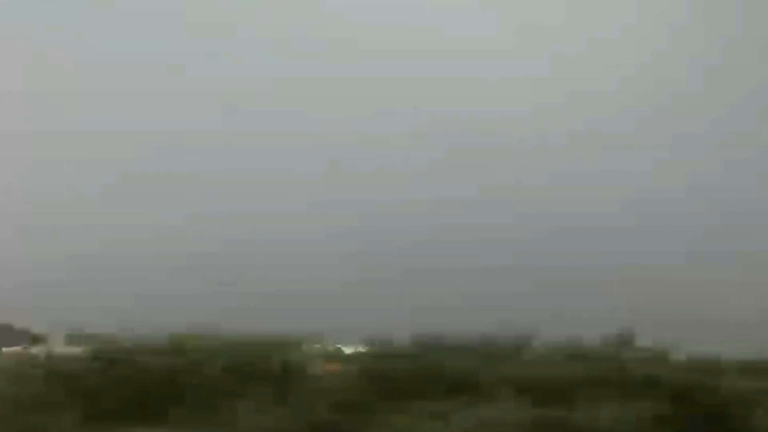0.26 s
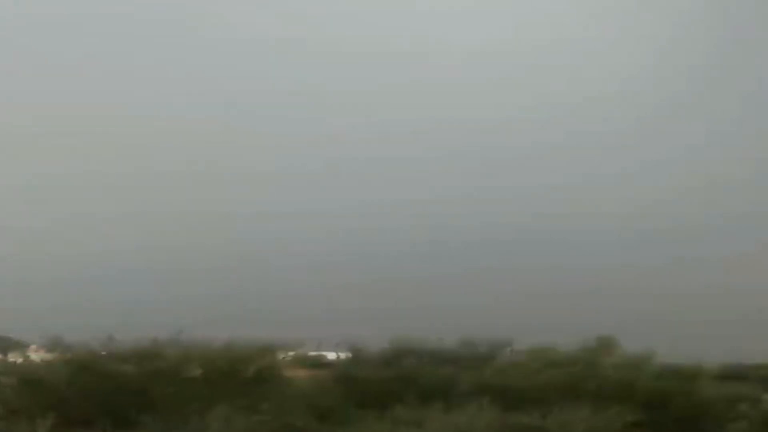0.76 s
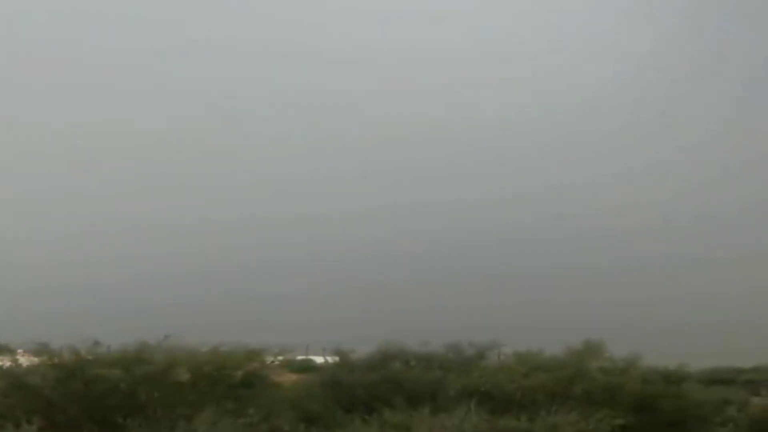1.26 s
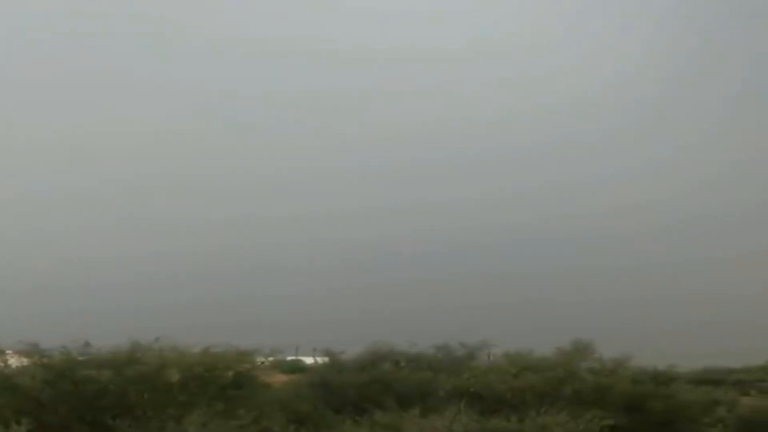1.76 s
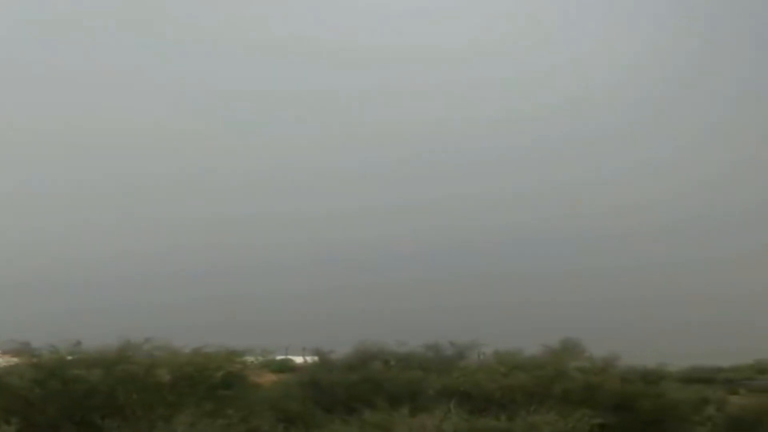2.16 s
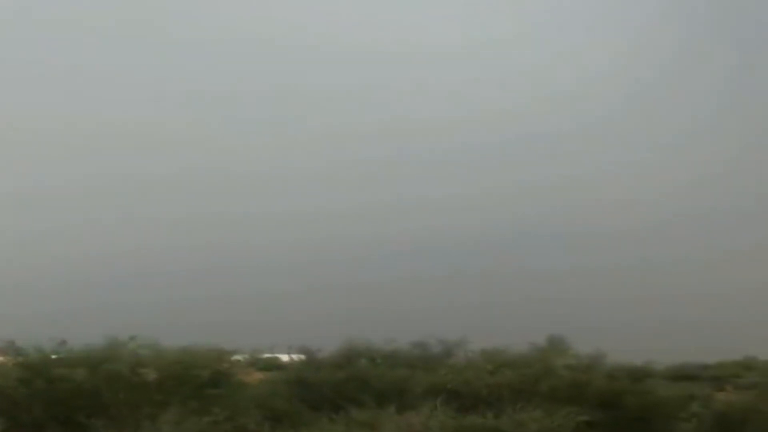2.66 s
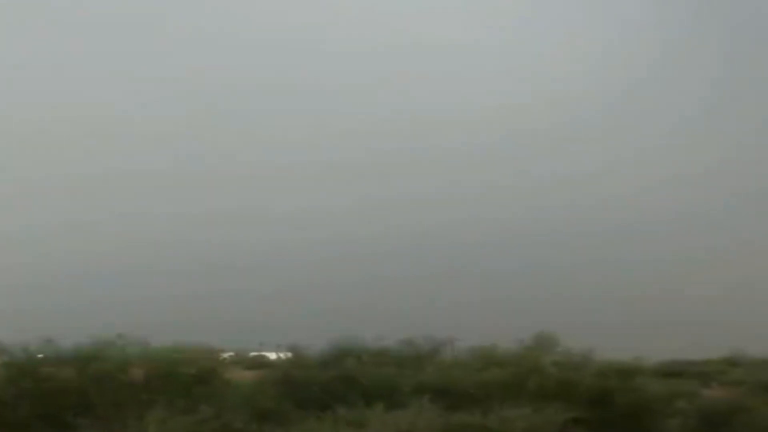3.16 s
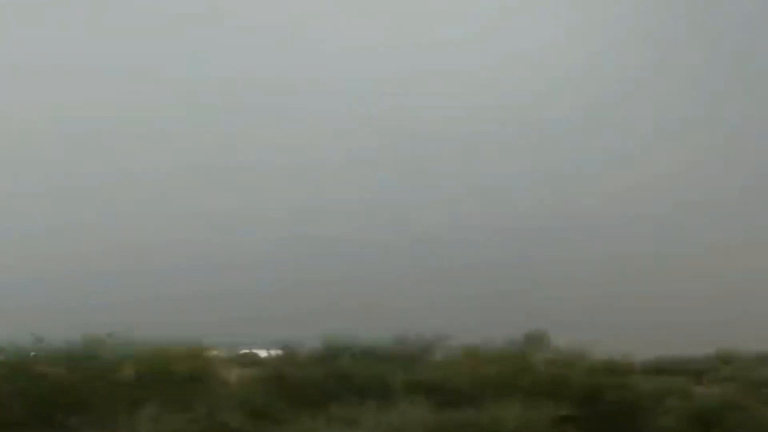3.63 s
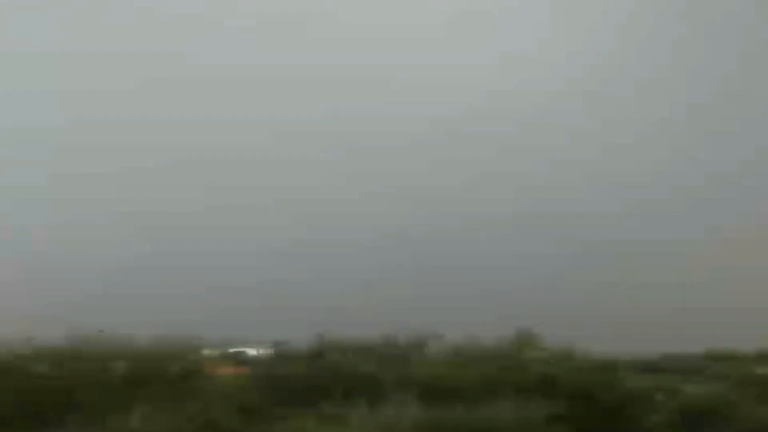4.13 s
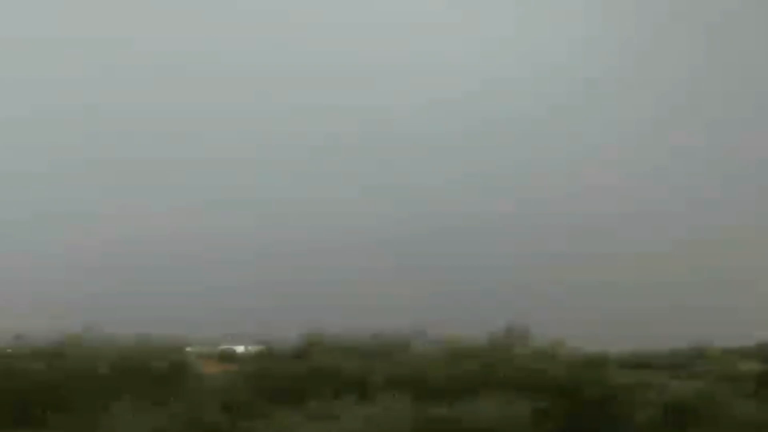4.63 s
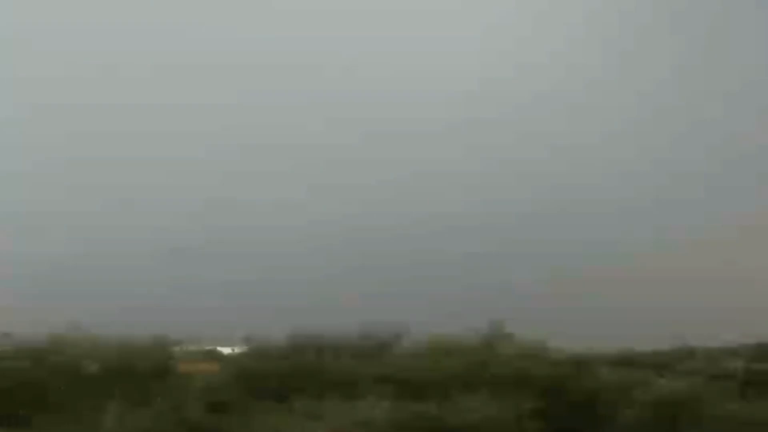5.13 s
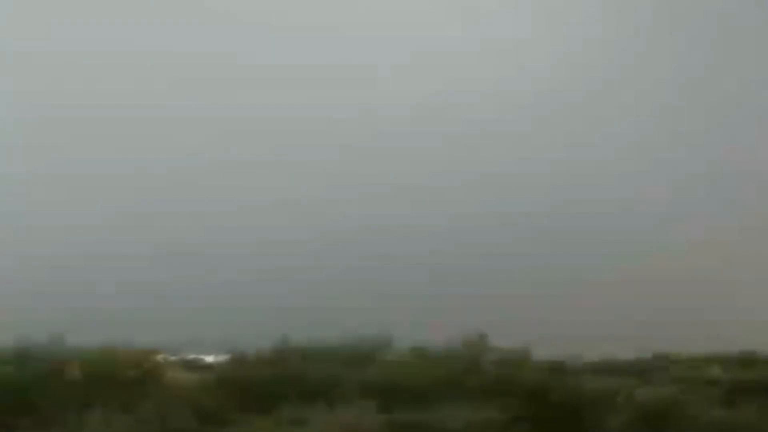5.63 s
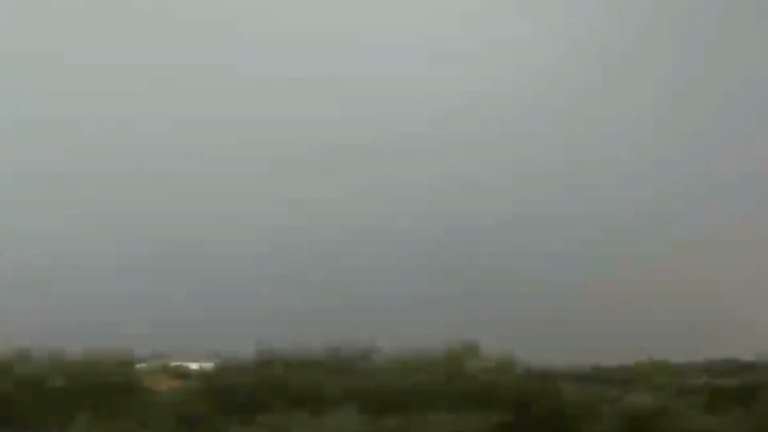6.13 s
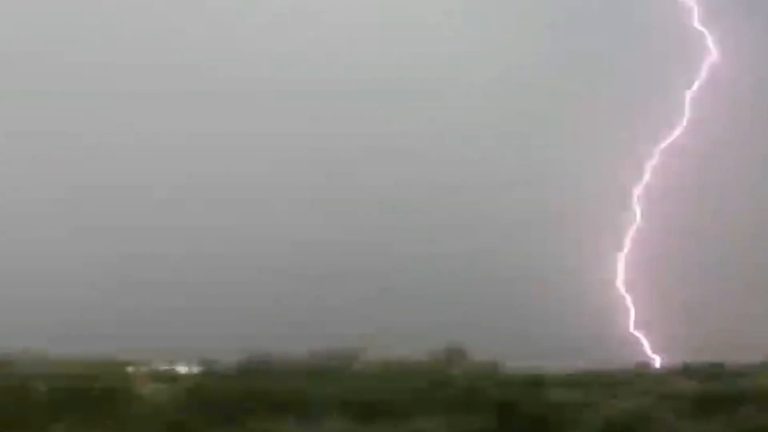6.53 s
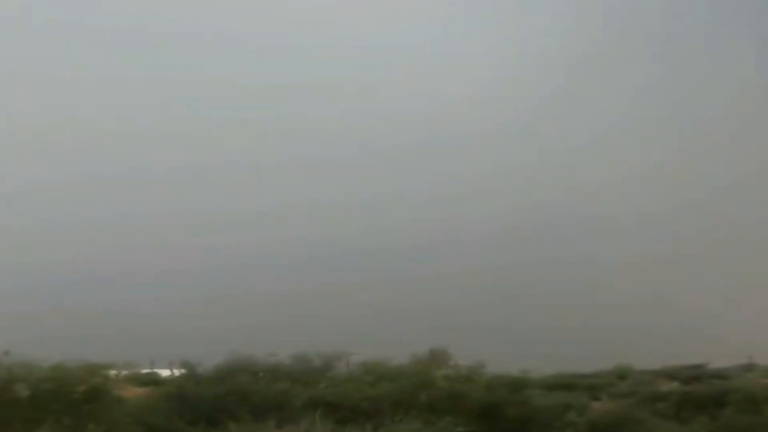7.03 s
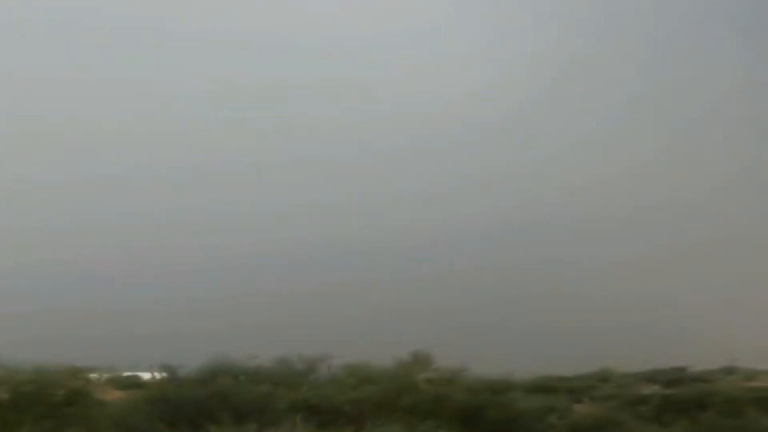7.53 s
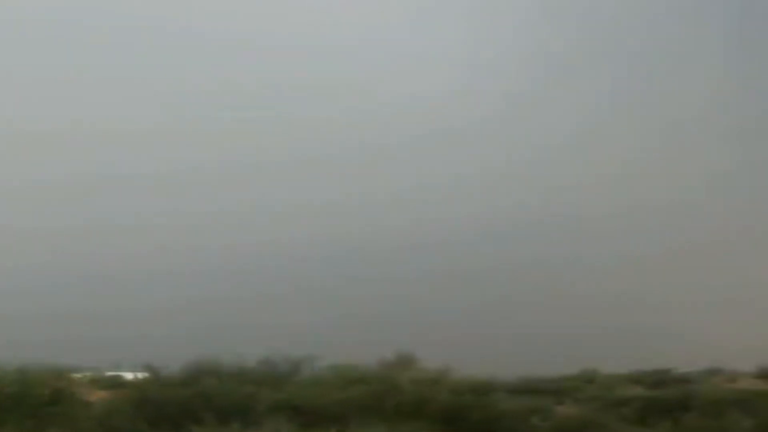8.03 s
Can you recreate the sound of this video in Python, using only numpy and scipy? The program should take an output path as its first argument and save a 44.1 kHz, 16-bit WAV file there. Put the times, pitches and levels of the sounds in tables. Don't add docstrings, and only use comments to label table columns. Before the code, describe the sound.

Far-off thunder mutters and rolls over open scrub, dips to a quiet lull near two seconds, then surges into dense, deep, lumpy booms around three and a half seconds and again past six. Thin rain hiss sits far beneath, with scattered dry drop ticks close to the microphone on soil, wood, stones and leaves. A barely audible animal low passes mid-way. The small outdoor microphone gives little extreme bass.

```python
import sys
import numpy as np
from scipy import signal
from scipy.fft import rfft, irfft, next_fast_len
from scipy.io import wavfile
from scipy.ndimage import uniform_filter1d

SR = 44100
rng = np.random.default_rng(int(sys.argv[2]) if len(sys.argv) > 2 else 0)


def ratio_of_db(decibels):
    return 10 ** (np.asarray(decibels, float) / 20)


def file_out(sig):
    cols = np.atleast_2d(sig).T
    lim = np.clip(cols, -1, 1)
    pcm = np.round(lim * 32767).astype(np.int16)
    wavfile.write(sys.argv[1], SR, pcm)


N = 365588


def evened(x):
    return x / np.sqrt(np.mean(x ** 2) + 1e-20)


def smoothed_twice(x, size):
    return uniform_filter1d(uniform_filter1d(x, size), size)


def read(points, hz):
    f, value = np.transpose(points)
    return np.interp(np.log(hz + 1), np.log(f + 1), value)


def curve(rows):
    s, *columns = np.transpose(rows)
    return [np.interp(np.arange(N) / SR, s, c) for c in columns]


def add(mix, s, sound):
    part = mix[round(s * SR):][:len(sound)]
    part += sound[:len(part)]


def split(x, edges_hz, gain):
    size = next_fast_len(x.shape[-1])
    hz = np.fft.rfftfreq(size, 1 / SR)
    below = [0 * hz] + [1 / (1 + (hz / e) ** 10) for e in edges_hz] + [1 + 0 * hz]
    z = rfft(x, size) * gain(hz)
    return [irfft(z * (b - a), size)[..., :x.shape[-1]] for a, b in zip(below, below[1:])]


def scatter(per_s, spread_db, most=3.7):
    draw, size = rng.random((2, N))
    at = np.flatnonzero(draw < per_s / SR)
    sign = np.where(draw[at] < per_s / SR / 2, -1, 1)
    out = np.zeros(N)
    out[at] = sign * ratio_of_db(spread_db * np.minimum(-np.log(size[at] + 1e-12), most))
    return out


def swell(s, db, rise_ms, fade_ms):
    ms = 1000 * (np.arange(0, N + 128, 128) / SR - s)
    away = np.where(ms < 0, -ms / max(rise_ms, 20), ms / max(fade_ms, 20))
    return ratio_of_db(2 * (db - 20 * away))


# [t/s, level/dB, brightness/dB]
MUTTER = [
    (0.0, -36.5, 13.5),
    (1.2, -43.5, 11),
    (2.1, -40, 7.5),
    (3.0, -35.5, 5),
    (4.3, -30.5, -6.5),
    (5.6, -36.5, -0.3),
    (7.0, -29, -9.5),
    (8.29, -35, -12.5),
]
# [peak t/s, level/dB,
# brightness/dB, rise/ms, fade/ms]
PEALS = [(0.092, -25.5, -8, 120, 150), (0.265, -27.5, -4.5, 82, 350), (0.523, -23, -3, 220, 170),
         (0.668, -26, -7.5, 150, 240), (0.954, -30.5, -4.5, 350, 680), (1.268, -37.5, -22, 210, 240),
         (1.527, -35.5, -7, 150, 3800), (2.06, -40.0, -18, 120, 50.0), (2.207, -23, -4.5, 135, 570),
         (2.367, -29, -11, 18, 350), (2.743, -40, -13.5, 26, 470), (3.142, -24, -4, 100, 4100),
         (3.491, -19, -3.5, 280, 530), (3.792, -26.5, -10, 46, 190), (4.088, -23, -10.5, 140, 200),
         (4.532, -21.5, 5.5, 690, 320), (5.025, -28, 8.5, 400, 900), (5.176, -28.5, 16, 260, 220),
         (5.395, -34.5, -6, 560, 930), (5.833, -23.5, 2, 350, 480), (6.167, -21, -1, 180, 610),
         (6.3, -29.5, 15, 440, 100), (6.596, -26, -10.5, 110, 140), (6.705, -33, 8, 140.0, 260),
         (2.900, -30, 0.5, 140, 130),
    (3.680, -33, 5.5, 150, 240),
    (3.950, -36.5, 9, 130, 180),
    (6.390, -26.5, 3, 110, 110),
    (7.000, -39, -14, 110, 140),
    (7.130, -36, -8, 100, 210),
    (7.270, -35, 12.5, 380, 170),
    (7.700, -56, -2, 100, 150),
    (8.040, -34.5, -7.5, 470, 480),
]
# [peak t/s, level/dB, fade/ms]
BOOMS = [(0.007, -36, 70.0), (0.156, -33, 110), (0.528, -29, 200.0), (0.81, -48, 90.0), (1.306, -35, 160),
         (2.229, -19.5, 89), (2.366, -34.5, 540), (2.651, -34, 97), (2.848, -40.5, 600.0), (3.074, -26, 95),
         (3.31, -20, 88), (3.45, -14, 100), (3.68, -29, 120), (3.99, -29, 250), (4.266, -37, 120.0),
         (4.369, -21.5, 450), (4.56, -31, 540), (5.016, -26, 450), (5.167, -31, 60.0), (5.553, -36, 200),
         (5.803, -27, 230), (6.092, -23.5, 150.0), (6.565, -32.5, 140), (6.729, -25, 100), (6.974, -34, 89),
         (7.25, -36.5, 450)]
# [level offset/dB, share of the brightness]
MUTTER_BANDS = [
    (-11.5, 0.14),
    (-1.5, 0.3),
    (-2, 0.37),
    (-9.5, 0.75),
    (-19.5, 0.99),
]
# [level offset/dB, share of the brightness]
PEAL_BANDS = [
    (-11, -0.56),
    (-1.5, -0.42),
    (-1, 0.56),
    (-13.5, 0.063),
    (-28, 0.58),
]


def roll_levels():
    mutter_db, mutter_bright_db = curve(MUTTER)
    booms = sum(swell(s, db, 0.53 * fade, fade) for s, db, fade in BOOMS)
    boom_shares = [1, ratio_of_db(2 * -8), 0, 0, 0]
    levels_db = []
    for (offset, lean), (peal, tilt), share in zip(MUTTER_BANDS, PEAL_BANDS, boom_shares):
        peals = sum(swell(s, db + peal + tilt * bright, rise, fade)
                    for s, db, bright, rise, fade in PEALS)
        arrivals = np.interp(np.arange(N) / 128, np.arange(len(booms)), peals + share * booms)
        mutter = ratio_of_db(2 * (mutter_db + offset + lean * mutter_bright_db))
        levels_db.append(10 * np.log10(arrivals + mutter))
    return levels_db


ROLL_EDGES_HZ = [90, 200, 420, 800]
# [f/Hz, level/dB per Hz]
AIR = [(12, -53), (20, -47.5), (70, -6), (170, 4), (276, -2.5), (338, -7), (390, -11), (467, -15.5),
       (659, -24.5), (744, -27.5), (1390, -51.5), (2500, -79.5), (3250, -80), (5500, -120)]
# [t/s, share 0-1, delay/ms]
GROUND = [(0, 0.37, 6.7), (2.0, 0.28, 6.85), (2.9, .45, 6.66), (3.1, 0.14, 7.67), (4.0, 0.19, 8.23),
          (4.7, 0.09, 6.66), (8.29, 0, 7.7)]


def roll():
    levels_db = roll_levels()
    direct = scatter(2500, 1.78)
    share, delay_ms = curve(GROUND)
    late = np.round(np.arange(N) - delay_ms * SR / 1000).astype(int)
    both = direct + np.clip(share, 0, 1) * direct[late]

    def path_gain(hz):
        bump_db = 4 / (1 + ((hz - 1530) / 60) ** 2)
        return ratio_of_db(read(AIR, hz) + bump_db)

    bands = split(both, ROLL_EDGES_HZ, path_gain)
    out = np.zeros(N)
    for band, db, size in zip(bands, levels_db, (3000, 2000, 1800, 2200, 2200)):
        drift = smoothed_twice(band ** 2, size)
        lumps = evened(smoothed_twice(rng.standard_normal(N), 4000))
        throb_db = 1.5 * lumps
        out += ratio_of_db(db + throb_db) * band / np.sqrt(drift + 1e-20)
    return out


# [f/Hz, level/dB per Hz]
HISS = [(530, -23), (900, -1), (1420, -10.5), (1570, -8.5), (2040, -14.5), (3380, -17.5), (4050, -23.5),
        (4980, -22), (10000, -29), (14400, -27.5), (16000, -29)]
# [t/s, level/dB]
RAIN = [
    (0.0, -64),
    (5.89, -63.5),
    (8.29, -63.5),
]


def hiss():
    frames, hz = N // 64 + 5, np.fft.rfftfreq(256, 1 / SR)
    a, b, patches = rng.standard_normal((frames, 129, 3)).T
    patches = uniform_filter1d(patches, size=3, axis=0)
    patches = evened(uniform_filter1d(patches, size=30, axis=1))
    flicker = evened(uniform_filter1d(rng.standard_normal(frames), 8))
    z = (a + 1j * b) * ratio_of_db(read(HISS, hz)[:, None] + 1.9 * patches + 1.6 * flicker)
    x = signal.istft(z, nperseg=256, noverlap=192)[1][:N]
    top = split(x, [2500], np.ones_like)[1]
    return ratio_of_db(curve(RAIN)[0] - 3.5) * x / top.std()


def patter():
    out, t = np.zeros(N), np.arange(120) / SR
    for hz in np.geomspace(2500, 15000, num=16):
        tick = np.sin(2 * np.pi * hz * t) * np.exp(-t * hz) * ratio_of_db(0.19 * read(HISS, hz))
        out += signal.oaconvolve(scatter(30, 3.4, 2.5), tick)[:N]
    return ratio_of_db(curve(RAIN)[0] - 11) * evened(out)


def spatter():
    _, middle, top = split(scatter(150, 4, 2.6), [2300, 7000], np.ones_like)
    fine = split(scatter(70, 4, 2.8), [8500], np.ones_like)[1]
    mix = ratio_of_db(-12) * evened(middle) + ratio_of_db(-11.5) * evened(top) + ratio_of_db(-13.5) * evened(fine)
    return ratio_of_db(curve(RAIN)[0]) * mix


# [t/s, energy level/dB,
# colour f/Hz, spread/octaves]
NEAR_DROPS = [(0.059, -32, 1500, 1.7), (0.2408, -27, 1500, 0.86), (0.5872, -33.8, 1800, 1.8),
              (0.8233, -37, 1500, 2), (0.8529, -32, 1800, 1.4), (1.9103, -33, 2000, 0.96),
              (2.175, -37.9, 1500, 2), (2.4368, -33, 1500, 2), (2.5951, -33, 1800, 2),
              (2.5993, -31, 1506, 1.4), (2.6328, -28.5, 1500, 1.2), (2.9873, -28, 1500, 1.3),
              (3.1313, -32.4, 1800, 1.8), (3.408, -31, 1500, 1.5), (3.4115, -28, 2000, 1.1),
              (3.4178, -31, 1800, 0.63), (3.4275, -38, 2000, 2), (3.491, -39, 1680, 2),
              (3.7533, -36, 1500, 1.7), (4.2074, -34, 1800, 1.3), (4.53, -38.5, 2000, 1.8),
              (4.9523, -38, 1800, 2), (5.4167, -32, 2000, 1.1), (5.763, -35, 1700, 2),
              (5.8659, -32, 1530, 1.5), (5.8765, -42, 1500, 2), (6.0187, -26.5, 2000, 1.3),
              (6.3755, -38, 1700, 1.4), (6.4404, -21, 2000, 1.2), (6.9015, -35.4, 1700, 1.4),
              (7.107, -31.5, 2000, 1.15), (7.1597, -31, 1500, 2.4), (7.2342, -39.0, 1700, 1.6),
              (7.3282, -38.0, 2000, 1.4), (7.3494, -41, 1500, 2), (7.5125, -28.5, 1700, 1.3),
              (7.531, -33, 1500, 1.4), (7.893, -39.0, 1500, 1.7), (7.9924, -35, 1500, 2),
              (8.1177, -32, 1500, 1.2), (8.1875, -37.1, 1700, 2), (8.2844, -41, 1500, 2),
              (0.237, -34, 3000, 2.2), (0.3679, -33, 3300, 1.2), (0.803, -39, 3300, 1),
              (1.46, -41.1, 2500, 2), (1.944, -33.4, 2500, 1.2), (2.637, -32, 2200, 1.2),
              (2.8239, -35.2, 3300, 1), (3.029, -28.7, 2200, 0.96), (3.2616, -37.2, 3300, 2),
              (3.4949, -36, 2690, 1.4), (3.9481, -38, 3300, 0.75), (3.963, -40.0, 2500, 2),
              (4.0506, -42, 2700, 2), (4.1752, -36.1, 2500, 1.4), (4.1884, -35.7, 3000, 2),
              (4.8713, -39, 2500, 2), (4.9014, -23.5, 2700, 0.89), (4.9339, -35, 3000, 1.22),
              (5.1041, -33.5, 3300, 1.6), (5.1626, -35, 2200, 1.5), (5.1845, -36, 2500, 2),
              (5.4585, -32.5, 3000, 1), (5.6959, -23.5, 2200, 1.3), (5.7497, -38.3, 3300, 1.4),
              (5.7923, -35.9, 2500, 1), (6.4373, -35.1, 2700, 1.4), (6.783, -38.4, 3320, 2),
              (6.9492, -34.4, 3000, 0.95), (6.9535, -40, 3300, 1), (7.1693, -38.0, 3000, 2),
              (7.339, -29.5, 2500, 0.75), (7.4907, -28.9, 2000, 1.4), (7.5228, -30.1, 3300, 2),
              (7.594, -29.5, 2200, 1.4), (7.8481, -29.5, 2700, 1.3), (7.9863, -28, 2700, 0.4),
              (8.0425, -30, 2200, 1.2), (8.0591, -30, 2700, 1.2), (8.0981, -37.7, 2700, 2),
              (8.1956, -34, 3300, 0.8), (8.2574, -27.7, 2200, 0.83), (8.276, -29.5, 2500, 1.2),
              (0.012, -28.5, 3700, 1.2), (0.0792, -30, 5000, 2), (0.5917, -33.8, 4500, 0.88),
              (0.7723, -44, 4500, 1), (0.984, -39, 4500, 2), (1.66, -32, 6100, 1.4),
              (1.6809, -28.5, 6100, 1.04), (1.8757, -39.3, 5000, 2), (1.9253, -38.9, 4060, 0.33),
              (2.0746, -41.8, 5500, 0.4), (2.1153, -31, 6030, 0.83), (2.3063, -36.6, 3700, 1.1),
              (2.3928, -39.6, 4500, 0.55), (2.4994, -37.5, 5000, 1), (2.8056, -30.9, 3700, 0.75),
              (2.8683, -34.6, 5000, 2), (2.875, -41.1, 5500, 0.75), (2.9335, -31, 3680, 0.96),
              (3.4413, -33, 5000, 2), (3.4694, -33.6, 5000, 0.91), (3.6639, -37, 5050, 1.4),
              (3.8582, -39, 5000, 0.75), (4.4451, -40.4, 5000, 1.4), (4.6257, -35.1, 4080, 1.4),
              (4.7535, -33.2, 4100, 1.1), (4.8055, -32.1, 4500, 0.81), (5.4306, -33.4, 3700, 0.75),
              (5.5307, -30.9, 3700, 1.8), (5.6366, -33, 4510, 1), (6.0718, -39, 5000, 2),
              (6.434, -33.1, 3700, 1.6), (6.475, -40, 5500, 0.75), (6.7264, -41, 4100, 1),
              (7.0053, -33, 5500, 2), (7.1385, -32, 4500, 1), (7.2063, -37.8, 5600, 2),
              (7.25, -31, 3700, 1.4), (7.6423, -33, 3700, 1.6), (7.7181, -41.7, 5500, 0.83),
              (7.9705, -42.5, 5500, 2), (8.0177, -30.1, 4500, 1.4), (8.0221, -26.5, 4100, 1),
              (1.2273, -43.5, 13600, 0.55), (1.4808, -38, 9100, 0.4), (2.4313, -33, 8200, 2),
              (2.8105, -36.5, 6700, 0.58), (2.845, -43.4, 15000, 1), (3.3495, -33, 11100, 0.61),
              (3.4637, -38, 13600, 1), (3.5346, -44, 15000, 1), (3.718, -40.3, 6700, 1.4),
              (3.7419, -46.9, 12300, 0.4), (3.832, -43, 9100, 1.4), (3.9035, -38, 8200, 2),
              (4.1649, -32.5, 7400, 1), (4.2334, -32, 15000, 1), (4.3389, -41.7, 8200, 0.75),
              (4.4013, -43, 15000, 1), (4.5944, -35, 6700, 1), (4.6454, -39.9, 10100, 1),
              (4.6565, -36, 11100, 0.75), (4.6603, -41.2, 11100, 0.55), (4.9401, -44, 9100, 0.4),
              (5.4966, -37.1, 15000, 1.7), (5.5657, -40, 10100, 2), (5.6898, -46, 13600, 2),
              (5.8204, -31, 7400, 1), (5.9012, -40, 15000, 2), (5.922, -44.5, 10100, 0.4),
              (5.9766, -44, 6100, 0.55), (6.0462, -34, 8200, 2), (6.0665, -42.2, 9100, 0.55),
              (6.1352, -43.4, 15000, 0.75), (6.2122, -40, 15000, 1), (6.5721, -38, 9100, 2),
              (6.5866, -41.3, 15000, 2), (7.24, -23.5, 15000, 1.4), (7.2436, -36.3, 10100, 0.55),
              (7.4323, -29.5, 7400, 2), (7.6761, -44.0, 13600, 2), (7.8173, -44.4, 15000, 1.2),
              (7.915, -44.3, 7400, 0.75), (7.9999, -35.6, 7400, 2), (8.012, -28, 9100, 1.4)]


def drops():
    out, t, hz = np.zeros(N), np.arange(2048) / SR, abs(np.fft.fftfreq(2048, 1 / SR)) + 1
    rows = np.array(NEAR_DROPS)
    landing_t60_s, spray_t60_s = 0.0024, 0.07
    noise = rng.standard_normal((len(rows), len(t)))
    landing = noise * ratio_of_db(-60 * t / landing_t60_s) + 5 * (t == 0)
    spray = noise[:, ::-1] * 0.09 * ratio_of_db(-60 * t / spray_t60_s)
    octaves = np.log2(hz / rows[:, 2:3])
    bell = -.5 * (octaves / np.clip(rows[:, 3:], .2, 3)) ** 2
    low_cut = .5 * np.log1p((1400 / hz) ** 6)
    log_gain = np.maximum(bell - low_cut, -6)
    colour = np.exp(np.conj(signal.hilbert(log_gain)))
    ticks = np.fft.ifft(np.fft.fft(landing + spray) * colour).real
    for (s, db, *_), tick in zip(rows, ticks):
        head = tick[:100]
        add(out, s - np.argmax(abs(head)) / SR, ratio_of_db(db) * tick / np.linalg.norm(head))
    return out


# [t/s, peak level/dB, f/Hz]
FRONTS = [(0.075, -17, 217), (0.114, -14, 207), (0.272, -12.5, 185), (0.6616, -10.5, 199),
          (1.0847, -14, 180), (1.3017, -11.5, 168), (2.1672, -7, 153), (2.204, -8, 116), (2.251, -6, 95),
          (2.378, -3, 128), (2.7657, -9.5, 148), (2.9171, -17, 324), (3.257, -7, 196), (3.4407, -3, 132),
          (3.468, -9.5, 145), (3.5068, -1, 126), (3.531, -4, 111), (3.622, -3, 156), (3.893, -13, 190),
          (4.0962, -7.5, 124), (4.5046, -6.5, 151), (5.0491, -8.5, 300), (5.1503, -15, 228),
          (5.1853, -7, 246), (5.8381, -4.5, 234), (6.168, -3.5, 164), (6.2184, -3, 247), (6.308, -1.5, 197),
          (6.698, -5.5, 222), (6.9769, -10, 155)]


def fronts():
    out, cover = np.zeros(N), np.zeros(N)
    for s, db, hz in FRONTS:
        u = np.arange(-3, 3, hz / SR)
        add(out, s - 3 / hz, ratio_of_db(db - 5.5) * np.exp(-(u / 0.99) ** 2) * np.cos(2 * np.pi * u))
        add(cover, s - 3 / hz, np.exp(-(u / 0.6) ** 2))
    uncovered = 1 - 0.48 * np.minimum(cover, 1)
    return out, uncovered


# [t/s, peak level/dB, ring f/Hz, width/Hz, t60/ms]
PLINKS = [(.524, -49, 2990, 2500, 50), (1.379, -48, 2480, 3000, 79), (1.680, -57, 8330, 8000, 24),
          (1.91, -38, 3680, 1500, 14), (2.390, -52, 4520, 3000, 30), (2.431, -46.5, 2140, 700, 73),
          (2.594, -50, 3100, 1500, 60), (3.405, -35.5, 1590, 2200, 96), (3.947, -46, 4560, 2500, 22),
          (4.641, -53, 7560, 3262, 64), (5.185, -48.5, 1940, 200, 50), (6.433, -49, 3520, 4000, 50),
          (5.924, -46, 2970, 4000, 30), (6.232, -36.5, 1356, 590, 47), (6.948, -51, 4560, 5000, 60),
          (7.159, -37, 1050, 900, 48), (7.222, -48, 4500, 8640, 110), (7.241, -50, 8700, 8000, 50),
          (7.338, -35.5, 4100, 756, 12), (7.983, -37, 2960, 250, 24), (7.985, -38, 1200, 300, 40),
          (8.041, -41, 2210, 250, 32), (8.044, -41, 1250, 300, 45), (.236, -48, 2970, 7000, 70),
          (.187, -54, 9000, 9000, 50), (2.428, -51, 6050, 9000, 66), (2.593, -51, 6500, 7000, 50),
          (2.806, -56, 6500, 4000, 40), (3.347, -52.5, 10900, 7000, 30), (3.695, -49, 3000, 2000, 40),
          (5.222, -51, 1750, 391, 60), (3.378, -52, 4040, 3000, 40)]


def plinks():
    out, t = np.zeros(N), np.arange(5000) / SR
    noise = rng.standard_normal((len(PLINKS), 2, len(t)))
    for (s, db, hz, width, t60_ms), (a, b) in zip(PLINKS, noise):
        t60 = t60_ms / 1000
        r = np.exp(-np.pi * width / SR)
        fuzz = signal.lfilter([1], [1, -2 * r, r * r], a + 1j * b)
        steadied = fuzz / abs(fuzz) ** .5
        ring = evened((steadied * np.exp(2j * np.pi * hz * t)).real)
        rise = np.minimum(t / (0.044 * t60), 1)
        add(out, s, ratio_of_db(db - 3.0 - 60 * t / t60) * rise * ring)
    return out


# [t/s, f/Hz, level/dB]
LOW = [
    (4.27, 171, -94),
    (4.32, 174, -69),
    (4.41, 179.5, -65.5),
    (4.6, 180.3, -66),
    (4.8, 175.3, -65.5),
    (4.93, 172.4, -64),
    (5.0, 167, -72),
    (5.05, 170, -80),
    (5.14, 166, -68),
    (5.25, 165, -95),
]
# [multiple of pitch, level/dB, drift/dB per s]
LOW_PARTIALS = [(10, -3, 3), (11, -10.5, 21), (12, -1.5, -15.5), (13, -4, 8), (14, -19, 7)]


def lowing():
    hz, db = curve(LOW)
    since = np.clip(np.arange(N) / SR - 4.6, -.4, .4)
    noise = rng.standard_normal((len(LOW_PARTIALS) + 1, N))
    waver, *fades = (evened(uniform_filter1d(v, 2600)) for v in noise)
    turns = np.cumsum(hz * (1 + 0.0016 * waver)) / SR
    voice = sum(ratio_of_db(d + drift * since + 2.4 * fade) * np.sin(2 * np.pi * round(k) * turns + k * k)
                for (k, d, drift), fade in zip(LOW_PARTIALS, fades))
    return ratio_of_db(db) * (db > -89) * voice


# [t/s, level/dB]
SQUEAK = [
    (4.57, -100),
    (4.6, -76),
    (4.62, -76),
    (4.635, -94),
    (4.66, -71),
    (4.672, -99.5),
]
# [f/Hz, level/dB, drift/dB per s]
SQUEAK_LINES = [(11790, 9, 0), (15280, 7, -200)]


def squeak():
    db, t = curve(SQUEAK)[0], np.arange(N) / SR
    since = np.clip(t - 4.6, 0, .1)
    waver = np.cumsum(rng.standard_normal(N)) * 0.049
    lines = sum(ratio_of_db(d + drift * since) * np.sin(2 * np.pi * hz * t + waver)
                for hz, d, drift in SQUEAK_LINES)
    return ratio_of_db(db) * (db > -94) * lines


def scene():
    strong, uncovered = fronts()
    thunder = uncovered * roll() + strong
    rain = hiss() + patter() + spatter() + drops() + plinks()
    return (thunder + rain + lowing() + squeak())[None]


def top_cut(x):
    return signal.sosfilt(signal.butter(12, 16520, fs=SR, output="sos"), x)


def record(dry):
    cut = signal.sosfilt(signal.butter(2, 32, "high", fs=SR, output="sos"), dry)
    lowpass = signal.firwin(1023, 15780, window=("kaiser", 5), fs=SR)
    mix = signal.oaconvolve(cut, lowpass[None], "same")
    return top_cut(mix)


dry = scene()
out = record(dry)
file_out(out)
```